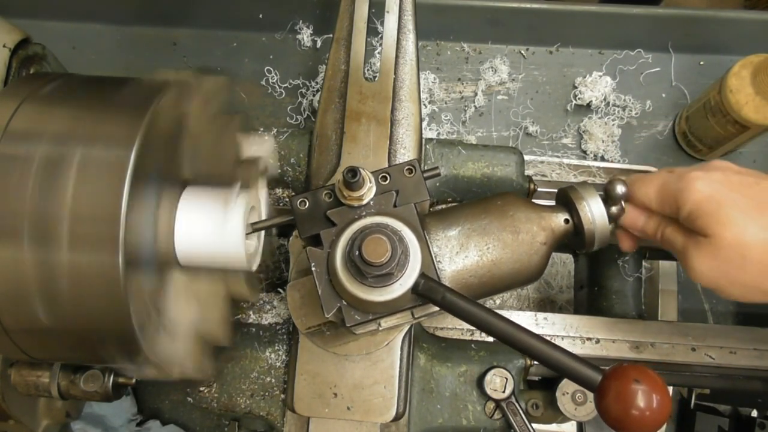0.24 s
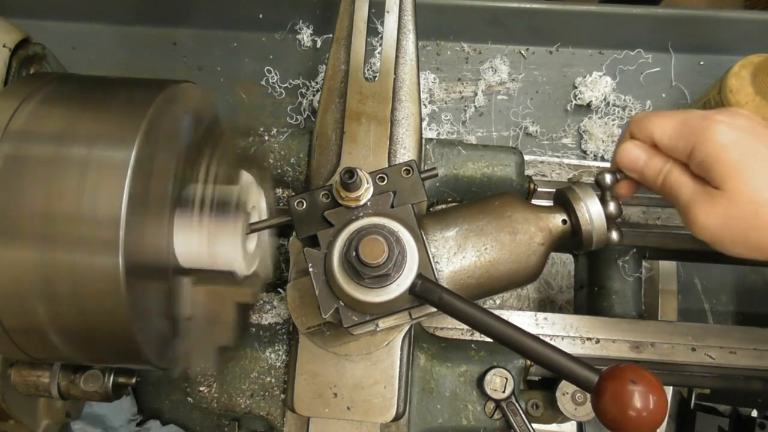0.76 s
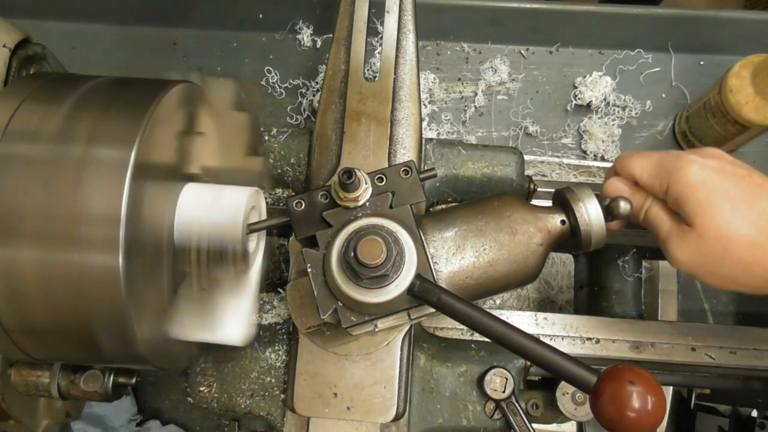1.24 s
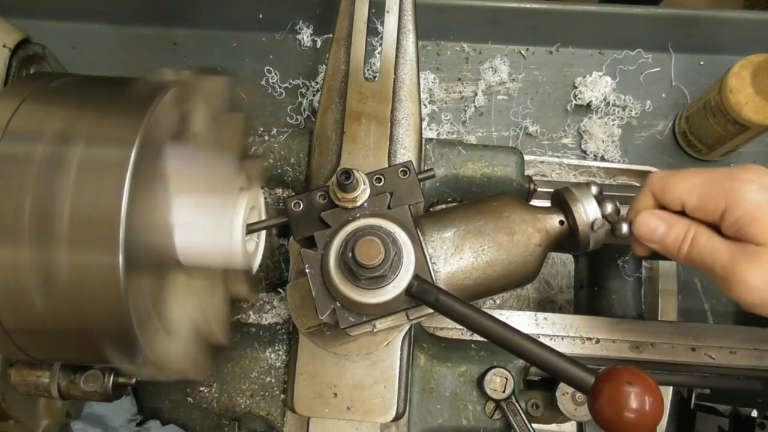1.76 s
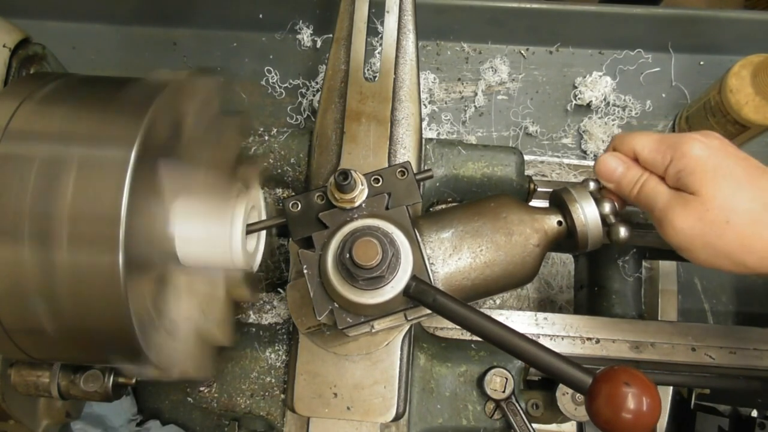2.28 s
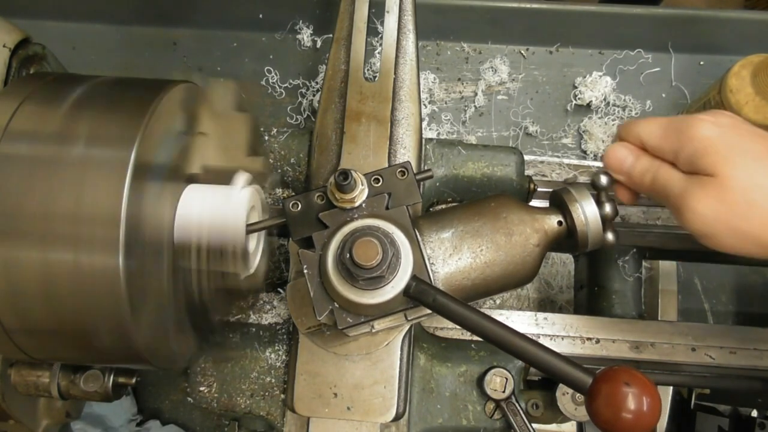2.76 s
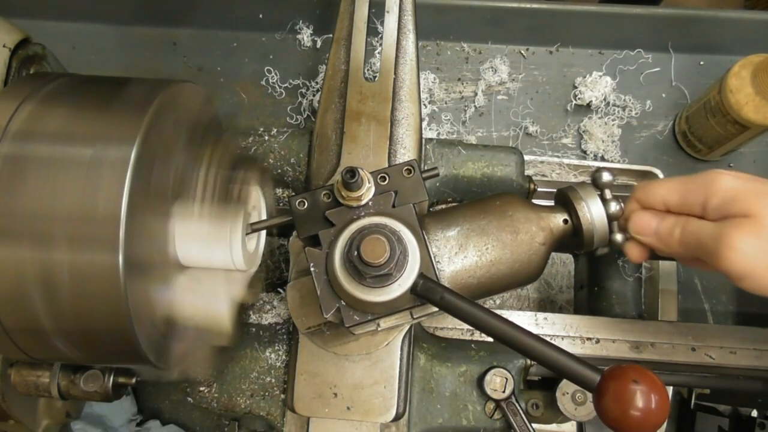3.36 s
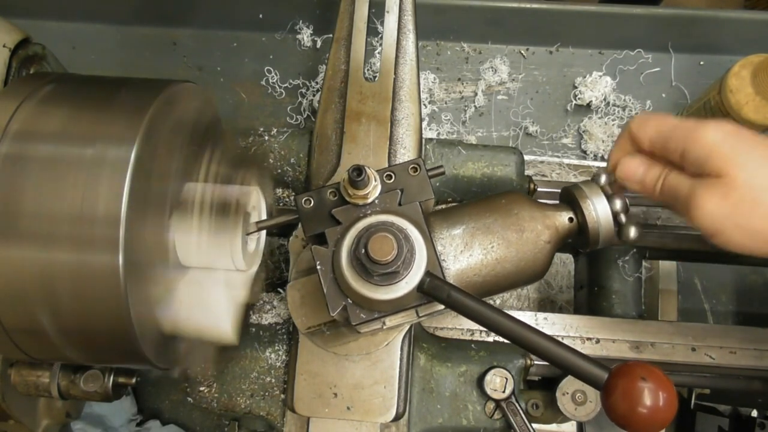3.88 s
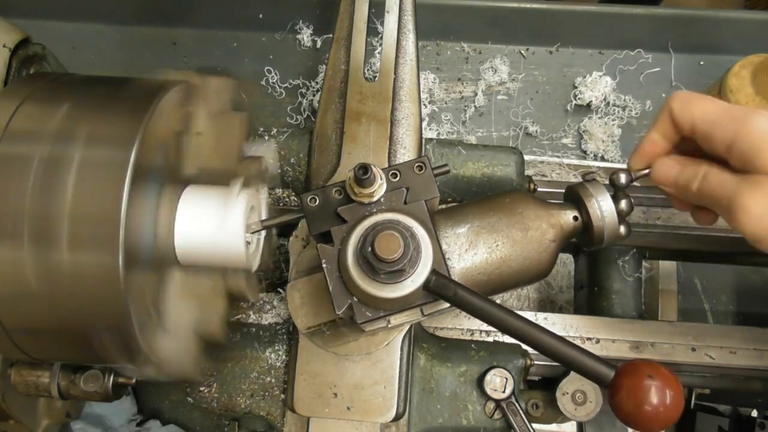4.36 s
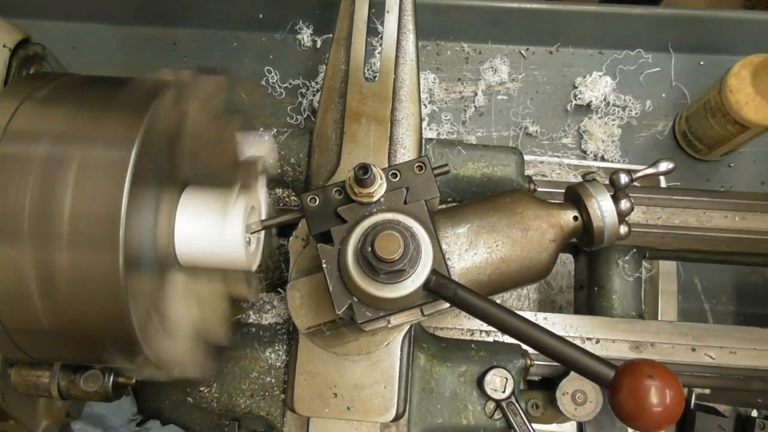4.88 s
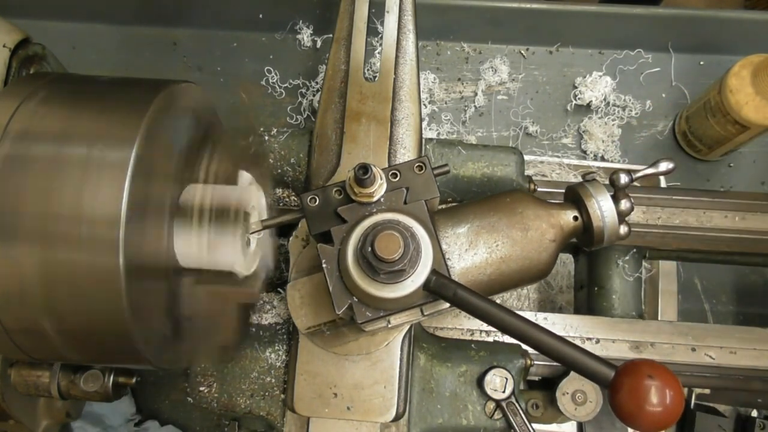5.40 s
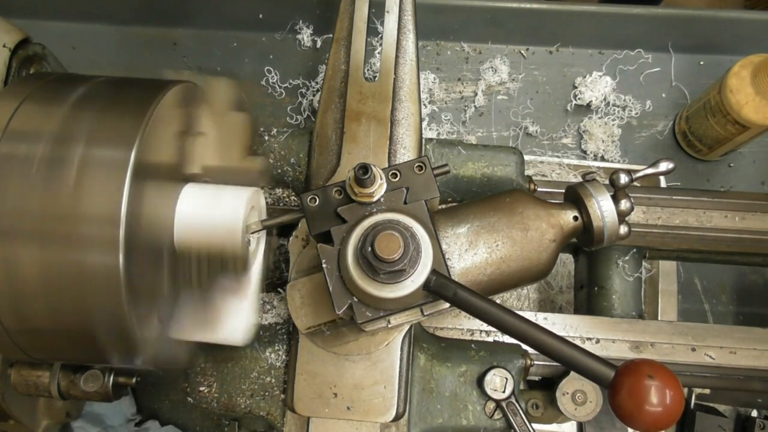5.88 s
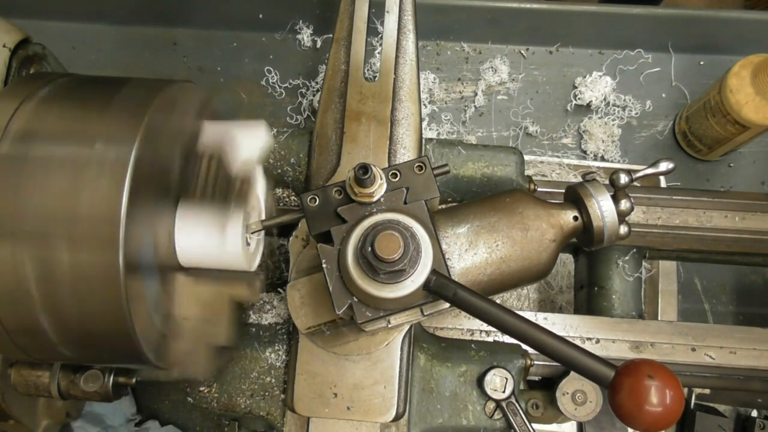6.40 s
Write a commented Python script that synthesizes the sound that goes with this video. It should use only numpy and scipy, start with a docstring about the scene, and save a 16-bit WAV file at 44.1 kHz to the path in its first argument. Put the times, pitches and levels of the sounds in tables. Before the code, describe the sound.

A boring bar sings a shrill unsteady note inside a spinning workpiece above a steady pulsing mains hum. The squeal gives way to thinner scratchy chirps and hissing scrape, which crackles before lifting off. Dull handle knocks and light ticks sound over the idling drive, then a loud metallic clack cuts power and a low rumble coasts on. Close stereo microphone, small reflective workshop.

```python
"""In a workshop, just above the tool post, a small metal lathe bores a spinning workpiece.
The motor's magnetic hum, a sum of close lines, throbs and beats; filtered noise makes the drive rumble and rattle.
The slender boring bar squeals as a gliding sine, chatters as wavering chirps, then only scrapes as resonant
noise until it leaves the cut. The feed handle knocks and loose metal ticks as short bursts through resonances.
The switch snaps off with noise and decaying modes, and the belt flaps as the spindle coasts."""
import sys
import numpy as np
from scipy import signal
from scipy.fft import rfft, irfft
from scipy.io import wavfile
from scipy.ndimage import uniform_filter1d

SR = 44100
rng = np.random.default_rng(int(sys.argv[2]) if len(sys.argv) > 2 else 0)


def persist_wave(psi):
    """Save psi, clipped to +-1, as 16-bit WAV."""
    counts = np.round(np.clip(psi, -1, 1) * 32767).astype(np.int16)
    wavfile.write(sys.argv[1], SR, np.atleast_2d(counts).T)


N = 292824
T = np.arange(N) / SR
F = np.maximum(np.fft.rfftfreq(N, 1 / SR), 1)

# Magnetic hum and its sidebands. Each row: multiple of mains, of belt rate and of rotor rate, summed.
HUM_ORDERS = [(2, 0, 0), (2, 1, 0), (2, -1, 0), (2, 4, 0), (2, 0, 1), (4, 0, 0), (4, 0, -1), (4, 7, 0),
              (6, 0, 0), (0, 0, 12), (0, 0, 31), (2, 0, 31), (0, 0, 37), (0, 0, 44), (0, 0, 48)]
# Level of each of those lines while powered. Each entry: rms level in dB.
HUM_LEVELS = [-20, -39.5, -53, -47, -61, -47.5, -52.5, -56, -45.5, -47.5, -64, -50, -56, -58, -58.5]
# Rotor slip, a little greater under the heavy cut. Each row: time in seconds, change of rotor rate in Hz.
ROTOR_SLIP = [(0, -.008), (2.3, -.007), (2.8, .003)]
# Drive as it coasts; the first row also holds before. Each row: time in seconds, speed share, rumble change in dB.
COAST_DOWN = [(5.97, 0.98, 4.5), (6.05, 0.95, 7), (6.2, .96, 0), (6.4, .92, -8), (6.64, 0.93, -6.5)]
# Belt and bearing rumble. Each row: frequency in Hz, relative level in dB.
RUMBLE_SPECTRUM = [(25, -23.5), (80, -19), (105, 1.5), (140, 9), (165, 3), (230, -4), (330, -2.5),
                   (400, -10), (520, -7), (700, -12), (950, -13), (1500, -22.5), (4000, -56)]
# Gear rattle in the headstock. Each row: frequency in Hz, relative level in dB.
GEAR_SPECTRUM = [(500, -20.5), (960, -13.5), (1100, 2), (1350, -2.5), (1620, -7), (1920, -2), (2250, -9),
                 (2750, -8), (4000, -18.5), (6000, -24.5), (7700, -20), (10000, -28), (12000, -37),
                 (15500, -47)]
# Squeal of the bar. Each row: time in seconds, pitch in Hz.
SQUEAL_PITCH = [(0.0, 5450), (0.094, 4410), (0.172, 4290), (0.236, 4570), (0.504, 4320), (0.542, 4180),
                (0.794, 4386), (0.884, 4850), (1.0, 6420), (1.088, 5030), (1.13, 4840), (1.184, 4980),
                (1.274, 5580), (1.442, 5067), (1.584, 5600), (1.704, 4590), (1.832, 4410), (1.89, 4460)]
# Scrape as the hand feeds the tool. Each row: time in seconds, level in dB before trims.
SCRAPE_LEVEL = [(0, -41), (.65, -42), (.95, -37.5), (1.7, -38.5), (2.1, -41), (2.25, -47.5), (2.65, -49),
                (3.1, -38), (3.7, -38.5), (3.9, -35.5)]
# Hesitations on the feed handle that thin the cut. Each row: centre in seconds, length in seconds, dip in dB.
FEED_PAUSES = [(1.96, 0.1, 1), (3.225, 0.042, 8), (3.417, 0.085, 6.5), (3.711, 0.022, 8)]
# Broken chatter of the bar. Each row: time in seconds, level in dB before a trim.
CHATTER_LEVEL = [(0, -48), (2.3, -41), (3.3, -42), (3.6, -48.5)]
# Bending modes that chatter. Each row: frequency in Hz, relative level in dB.
BENDING_MODES = [(4420, -9), (5130, -1.5), (5330, 0.5), (5600, -2)]
# Resonances of bar and holder. Each row: frequency in Hz, width in Hz, relative level in dB.
BAR_MODES = [(1930, 360, -11.5), (4350, 190, -11), (5170, 210, -11), (7650, 820, -0.5), (8560, 620, 0),
             (9540, 500, -5), (10500, 700, -8), (12700, 2000, -19)]
# The loudest chips snapping. Each row: start in seconds, starting level in dB before filtering.
CHIP_SNAPS = [(3.248, -34), (3.4994, -26), (3.637, -21.5), (3.6773, -23), (3.7935, -23), (3.82, -16.5),
              (3.867, -19.5), (3.9018, -20)]
# Handle knocking in its backlash. Each row: start in seconds, starting level in dB before gain and filtering.
HANDLE_KNOCKS = [(2.327, -30), (3.712, -29.5), (3.971, -28.5), (4.1, -29.5), (4.34, -26.5), (4.592, -30.5),
                 (4.836, -30), (4.967, -30)]
# Light metal ticks. Each row: start in seconds, level in dB before gain and filtering, ring in Hz.
METAL_TICKS = [(4.4015, -28, 3640), (4.9596, -39, 3020), (5.1552, -41.5, 2880), (5.5238, -42, 3010),
               (5.802, -31, 3070), (6.1594, -35, 5750), (6.4274, -56, 3020), (6.5345, -59.5, 3310)]
# Snap of the switch. Each row: frequency in Hz, relative level in dB.
SNAP_SPECTRUM = [(60, -25), (130, -4), (420, -10.5), (800, -8.5), (1750, 2.5), (2350, -3), (2950, -1.5),
                 (3700, -2.5), (5000, -11), (6300, -9.5), (7550, -4.5), (10000, -13.5), (12000, -29),
                 (15500, -40.5)]
# Switch housing and spring. Each row: frequency in Hz, starting level in dB, 60 dB decay time in seconds.
HOUSING_MODES = [(308, -29, 0.6), (546, -26.5, 0.28), (621, -32, 0.84), (753, -30, 0.33), (950, -41.5, 1),
                 (1087, -21.5, 0.24), (1254, -27, 0.36), (1330, -22, 0.17), (1730, -14, .1),
                 (1933, -32, 0.19), (2950, -19, 0.15), (3467, -22.5, 0.15), (3550, -26.5, .1),
                 (4330, -27, .14), (5260, -30, 0.22), (7500, -31, .22), (7601, -27, .2), (8473, -43, 0.4)]
# Level difference between the microphone ports. Each row: frequency in Hz, left minus right in dB.
PORT_BALANCE = [(60, -9), (120, -1.5), (200, -1), (370, -5.5), (700, -1.5), (1290, 2.5), (2380, 1),
                (4400, 1), (8100, -0.5), (14000, 6)]
# Phase by which the left port leads. Each row: frequency in Hz, lead in radians.
PORT_LEAD = [(260, 0), (1030, 1.02), (1550, 0.34), (2000, 0.58), (2700, -0.1), (6500, 0), (8600, -0.066),
             (10600, 0.82), (13000, 1.66)]

MAINS_HZ, BELT_HZ, ROTOR_HZ = 60.003, 7.95, 29.788
IN_STEP_S = .054  # the hum lines agree in phase here, apart from the rotor's slip angle
OFF_S, CUT_END_S = 5.9695, 3.94  # the switch opens; the tool leaves the cut
# the spindle turns steadily; the high side of the bore meets the tool at HIGH_SPOT_S and once a turn from there
SPINDLE_HZ, HIGH_SPOT_S = 7.55, 1.371
# the squeal grows by up to RESONANCE_DB while its pitch stays near the bar's resonance
SQUEAL_DB, RESONANCE_HZ, RESONANCE_WIDTH_HZ, RESONANCE_DB = -38.5, 5376, 590, 10.5
# near resonance the bar bites once a turn, just ahead of the high spot, after a dip of HITCH_DB
BITE_LEAD_S, BITE_S, BITE_DB, HITCH_DB = 0.013, 0.029, 5.5, 9
# the squeal starts to lose its grip, weakening until it breaks away
LOOSENS_S, LOOSEN_DB_PER_S, BREAK_S = 1.67, 25, 1.895
STALL_SHARE = 0.37  # swing left in a stall, where full grip adds 1
CHATTER_LAG_S = 0.0152  # delay of the chatter behind each deep spot of the cut
# chips pack in the bore until the cut ends; small ones crack at random, ever more often up to CRACKS_PER_S
PACKING_S, CRACKS_PER_S, CRACK_DB = 2.75, 45, -29.5
TOP_HZ = 15550


def amp(db):
    """Logarithmic level: decibels become an amplitude gain."""
    return 10 ** (np.asarray(db) / 20)


def unit(x):
    """Normalisation: the signal is scaled to rms 1."""
    return x / np.sqrt(np.mean(x ** 2))


def curves(rows):
    """Linear interpolation: each column of a time table, sample by sample."""
    s, *columns = np.transpose(rows)
    return [np.interp(T, s, c) for c in columns]


def across(points):
    """Interpolation on a logarithmic frequency axis of a (Hz, value) table."""
    hz, value = np.transpose(points)
    return np.interp(np.log(F), np.log(hz), value)


def colour(x, points):
    """Zero-phase filtering: the spectrum is multiplied by a (Hz, dB) curve."""
    return irfft(rfft(x) * amp(across(points)), N)


def resonate(x, modes):
    """Modal superposition: parallel damped resonances given as (Hz, width in Hz, dB)."""
    response = sum(amp(db) / (1 + 1j * (F * F - hz * hz) / (F * width)) for hz, width, db in modes)
    return irfft(rfft(x) * response, N)


def noise():
    """White noise: independent Gaussian samples."""
    return rng.standard_normal(N)


def walk(hz):
    """Band-limited chance: Gaussian low-passed noise of rms 1, moving at up to about hz."""
    return unit(irfft(rfft(noise()) * np.exp(-(F / hz) ** 2), N))


def turn(hz):
    """Phase as the integral of a changing rate."""
    return 2 * np.pi * np.cumsum(hz) / SR


def fade(start, t60):
    """Exponential damping: silence, then a decay of 60 dB in t60 seconds."""
    return (T >= start) * np.exp(-np.log(1000) * np.maximum(T - start, 0) / t60)


def powered(t60):
    """Stored energy: one while the current flows, dying away after the switch."""
    return (T < OFF_S) + fade(OFF_S, t60)


def workshop(x, t60, wet_db):
    """Diffuse reflection: chip pan and walls return decaying noise tails, unrelated left and right."""
    spectrum = [(130, -23), (300, 3.5), (2000, 1.0), (3200, -2), (5500, -15.0), (8500, -14), (13000, 4.0)]
    tails = [unit(colour(noise(), spectrum)) * fade(0.0017, t60) for _ in range(2)]
    return amp(wet_db) * np.array([signal.fftconvolve(x, h / np.linalg.norm(h))[:N] for h in tails])


def motor():
    """Beating: belt and rotor add lines close to the magnetic hum, which makes it throb."""
    slip_hz, = curves(ROTOR_SLIP)
    # angle by which the rotor runs ahead of a steady turn
    slip = turn(slip_hz) + .075 + .006 * walk(3)
    hum = 0
    for orders, db in zip(HUM_ORDERS, HUM_LEVELS):
        hz = np.dot(orders, [MAINS_HZ, BELT_HZ, ROTOR_HZ])
        phase = 2 * np.pi * hz * (T - IN_STEP_S) + orders[2] * slip
        hum = hum + np.sqrt(2) * amp(db) * np.cos(phase)
    # the hum holds full level until the decay has passed 7 dB
    return hum * np.minimum(1, powered(t60=0.13) * amp(7.0))


def gears(belt, rotor):
    """Amplitude modulation: gear rattle swells in time with the torque ripple and the shafts."""
    ripple, pulley, shaft, mesh = np.cos([4 * np.pi * MAINS_HZ * T, 7 * belt, 2 * rotor, 9 * rotor])
    load = np.exp(.33 * ripple + .12 * pulley + .14 * shaft + .13 * mesh)
    rattle = unit(colour(noise() * load, GEAR_SPECTRUM))
    return amp(-45.5) * rattle * (powered(t60=.3) + amp(-19.5))


def rumble(belt, rumble_db):
    """Broadband excitation: belt and bearings rumble as shaped noise, beside a tone at 7 times the belt rate."""
    rough = amp(-41.2 + rumble_db) * unit(colour(noise(), RUMBLE_SPECTRUM))
    return rough + amp(-53.0 + .5 * rumble_db) * np.cos(7 * belt)


def belt_flap(belt):
    """Narrow-band resonance: the slack belt flaps against the pulleys as the spindle coasts."""
    flap = unit(resonate(noise(), [(135, 6.2, 0)])) * (1 + 0.33 * np.cos(2 * belt))
    flap = colour(flap, [(70, -17), (110, -3.5), (165, -1.5), (300, -28), (2000, -51)])
    return amp(-39.0) * flap * fade(OFF_S, t60=2.17)


def bearings():
    """Random modulation: the faint bearing hiss is noise of uneven strength."""
    spectrum = [(1500, -16), (3300, -5.0), (5200, -18), (7800, -0.5), (10000, -4.5), (13000, -17)]
    return amp(-67.0) * unit(colour(noise() * amp(2.7 * walk(60)), spectrum))


def drive():
    """Kinematic coupling: belt and rotor phases share one changing speed."""
    speed, rumble_db = curves(COAST_DOWN)
    belt, rotor = turn(BELT_HZ * speed), turn(ROTOR_HZ * speed)
    return gears(belt, rotor) + rumble(belt, rumble_db) + belt_flap(belt) + bearings()


def knocks():
    """Impact response: blows in the feed screw's backlash excite dull, broad resonances."""
    blows = noise() * sum(amp(db) * fade(s, t60=0.16) for s, db in HANDLE_KNOCKS)
    body = resonate(blows, [(480, 170, -5), (673, 150, -3), (800, 190, -5.5)])
    return amp(14.0) * colour(body, [(900, -2), (3000, -6), (7000, -16), (13000, -28)])


def ticks():
    """Impact response: short bursts ring light loose metal at its own pitch and near 9 kHz."""
    rings = 0
    for s, db, hz in METAL_TICKS:
        burst = noise() * fade(s, t60=0.082)
        rings = rings + amp(db + 3.5) * resonate(burst, [(hz, 500, 2.5), (9000, 2500, -7)])
    return colour(rings, [(3000, 0.5), (9500, 1.0), (13000, -13.5)])


def switch():
    """Impulsive excitation of modes: the lever snaps and bounces, its housing clatters, its spring rings on (stereo)."""
    clatter = amp(-14.0) * fade(OFF_S, t60=0.037) + amp(-22.5) * fade(OFF_S + 0.016, t60=0.22)
    clatter = clatter + amp(-18.5) * fade(OFF_S, t60=0.23) + amp(-38.0) * fade(OFF_S, t60=0.82)
    common = noise()
    # the share that differs between the ports
    apart = [(100, 7), (1000, -4), (2500, -8.5), (5000, -27), (8000, -13), (13000, 10.5)]
    ports = np.array([unit(colour(common + colour(noise(), apart), SNAP_SPECTRUM)) for _ in range(2)])
    since = T - OFF_S
    ring = 0
    for hz, db, t60 in HOUSING_MODES:
        # the low modes take longest to build up as the blow spreads through the housing
        build = np.clip(since * min(hz, 1500) / 16 + 0.13, 0, 1)
        tone = np.sin(2 * np.pi * hz * since + rng.normal(0, 0.45, (2, 1)))
        ring = ring + amp(db) * build * fade(OFF_S, t60) * tone
    contact = np.clip(since / 0.0012, 0, 1)
    return (ports * clatter + ring) * contact * amp(np.array([[1], [-1]]) * 0.46)


def spindle_angle():
    """Uniform rotation past the high spot; three jaws pinch the work, so the cut deepens three times a turn."""
    return 2 * np.pi * SPINDLE_HZ * (T - HIGH_SPOT_S)


def chip_snaps(packed):
    """Brittle fracture: chips snap as short bursts on the bar's strongest modes, small ones at random."""
    cracks = (rng.random(N) < packed * CRACKS_PER_S / SR) * amp(CRACK_DB + 3.5 * noise())
    cracks = signal.fftconvolve(cracks, fade(0, t60=.025))[:N]
    bursts = noise() * (cracks + sum(amp(db) * fade(s, t60=0.062) for s, db in CHIP_SNAPS))
    snaps = resonate(bursts, [(8350, 400, 3), (9500, 550, -2.5)])
    return colour(snaps, [(3000, -18), (8000, 4), (11000, 1), (15000, -15)])


def scrape(spindle):
    """Random excitation of modes: dense tiny fractures at the edge ring each mode of the bar."""
    db, = curves(SCRAPE_LEVEL)
    db = db - sum(dip_db * np.exp(-(2 * (T - s) / length) ** 4) for s, length, dip_db in FEED_PAUSES)
    packed = np.clip((T - PACKING_S) / (CUT_END_S - PACKING_S), 0, 1)
    ring = 0
    for hz, width, mode_db in BAR_MODES:
        grains = noise() * amp(3 * walk(2500) + 3 * walk(170) + .8 * np.cos(3 * spindle))
        ring = ring + amp(mode_db) * unit(resonate(grains, [(hz, width, 0)]))
    spectrum = [(300, -16.5), (1500, 6), (3400, -10.0), (4400, 3), (6300, -1.5), (7600, 2), (13500, 1.0),
                (15500, -10)]
    ring = unit(colour(ring, spectrum))
    # the rubbing flank makes one high mode sing; packed chips strengthen it and make the cut uneven
    sing = unit(resonate(noise() * amp(4 * walk(120)), [(8370, 170, 0)])) * np.maximum(packed, .4)
    uneven = amp(2.2 * packed * walk(50))
    return uneven * (amp(db - 1.65) * ring + amp(db - 1.0) * sing) + chip_snaps(packed)


def chatter(spindle):
    """Intermittent instability: bending modes catch after each deep spot and chirp; the edge grates in its holder."""
    db, = curves(CHATTER_LEVEL)
    lobe = 3 * (spindle - 2 * np.pi * SPINDLE_HZ * CHATTER_LAG_S)
    # weak chatter is a thin clean thread; strong chatter is scratchy
    scratch = amp(db - db.max())
    chirps = 0
    for hz, mode_db in BENDING_MODES:
        pitch = hz + 70 * np.sin(lobe + walk(6)) + 110 * walk(15) + 180 * scratch * walk(900)
        catch = np.clip(.3 + .6 * np.cos(lobe) + walk(45), 0, 1.7)
        chirps = chirps + amp(mode_db) * catch * np.sin(turn(pitch))
    grit = noise() * amp(2.6 * walk(1500) + 2 * np.cos(lobe) + 2 * walk(90))
    holder = [(1900, 220, 2.5), (2570, 870, -3.5), (3920, 650, -5.5), (4450, 400, 0.0), (5130, 600, 6)]
    grate = colour(resonate(grit, holder), [(1000, -4.0), (1800, 3), (5400, -2.5), (7000, -10.0)])
    return amp(db - 6) * (unit(chirps) + unit(grate))


def squeal(spindle):
    """Self-excited vibration: a near sine glides, swells near resonance and throbs; the slipping edge adds overtones."""
    hz, = curves(SQUEAL_PITCH)
    # the vibration takes about a tenth of a second to follow, so a quick glide through resonance barely lifts it
    nearness = np.exp(-((hz - RESONANCE_HZ) / RESONANCE_WIDTH_HZ) ** 2)
    resonant = uniform_filter1d(nearness, size=SR // 10)
    # once a turn the edge hitches for a few milliseconds, then bites and flares
    since = (T - HIGH_SPOT_S + BITE_LEAD_S) % (1 / SPINDLE_HZ)
    until = 1 / SPINDLE_HZ - since
    bite_db = BITE_DB * np.exp(-(since / BITE_S) ** 2) - HITCH_DB * np.exp(-(until / .008) ** 2)
    bite_db = uniform_filter1d(bite_db, size=SR // 300)
    db = SQUEAL_DB + resonant * (RESONANCE_DB + bite_db)
    db = db - LOOSEN_DB_PER_S * np.maximum(T - LOOSENS_S, 0)
    # it stalls between the jaws and catches again, and flutters in between
    grip = .5 + .5 * np.tanh(2.5 * (np.cos(3 * spindle) + .35 + .3 * walk(60)))
    falter = unit((STALL_SHARE + grip) * amp(2.1 * walk(160)))
    swing = amp(db) * falter * ((T < BREAK_S) + fade(BREAK_S, t60=0.19))
    # pushed above resonance it turns rough; as it breaks away its pitch shoots upward and scatters
    rough = 0.007 + 0.13 * np.maximum(hz / RESONANCE_HZ - 1.06, 0) + .04 * (T > BREAK_S)
    hz = hz * np.exp(np.clip(T - BREAK_S, 0, .04) / .075)
    phase = turn(hz * (1 + .003 * np.cos(3 * spindle) + .005 * walk(35) + rough * walk(400)))
    harmonics = np.sin(2 * phase) + amp(-8) * np.sin(3 * phase)
    slips = (T < BREAK_S) * swing ** .5 * amp(3.5 * walk(60) - 1) * harmonics
    spectrum = [(8200, -6.5), (8750, 3), (9300, -1), (11000, -6), (12500, -1.5), (14000, -7), (16000, -19)]
    return np.sqrt(2) * swing * np.sin(phase) + amp(-24) * colour(slips, spectrum)


def boring():
    """Forced contact: all tool sounds share the spindle's angle and die away as the tool leaves the cut."""
    spindle = spindle_angle()
    tool = scrape(spindle) + chatter(spindle) + squeal(spindle)
    return tool * ((T < CUT_END_S) + fade(CUT_END_S, t60=0.087))


def scene():
    """Superposition: the lathe reaches two close microphone ports, directly and through the room."""
    lathe = motor() + drive() + knocks() + ticks() + boring()
    # each port takes half of the level and phase difference
    half = amp(across(PORT_BALANCE) / 2) * np.exp(.5j * across(PORT_LEAD))
    direct = irfft(rfft(lathe) * np.array([half, 1 / half]), N)
    snap = switch()
    return direct + snap + workshop(lathe + snap.mean(axis=0), t60=0.21, wet_db=-10.5)


def record(dry):
    """Clipping and band limiting: peaks are cut at 0.95, then a steep low-pass removes the top."""
    low_pass = signal.ellip(10, .1, 80, TOP_HZ, fs=SR, output="sos")
    return signal.sosfilt(low_pass, np.clip(dry, -.95, .95))


dry = scene()
out = record(dry)
persist_wave(out)
```